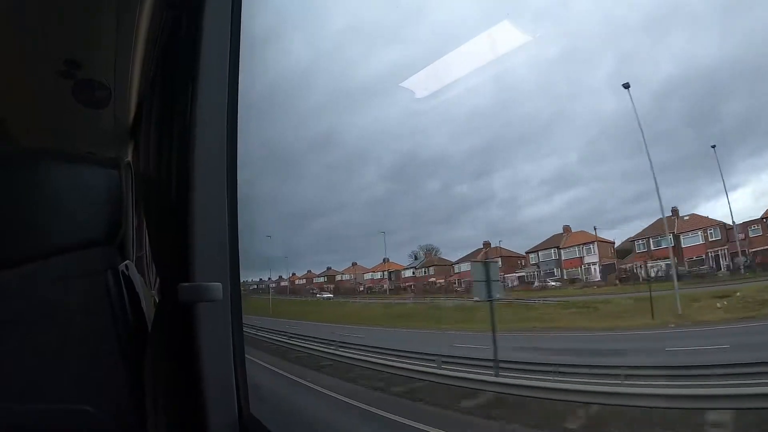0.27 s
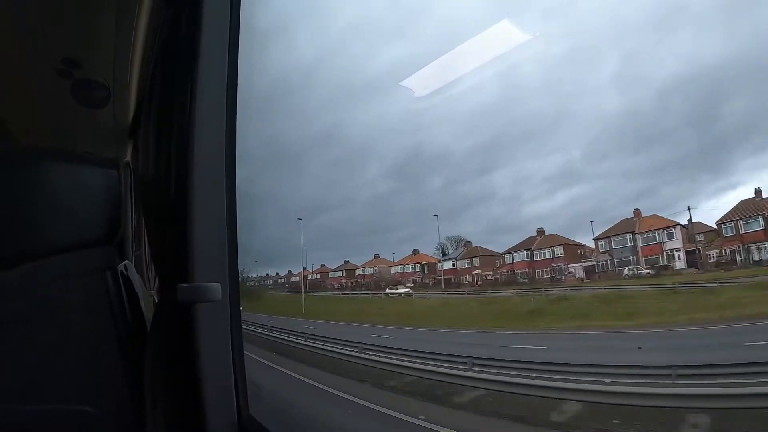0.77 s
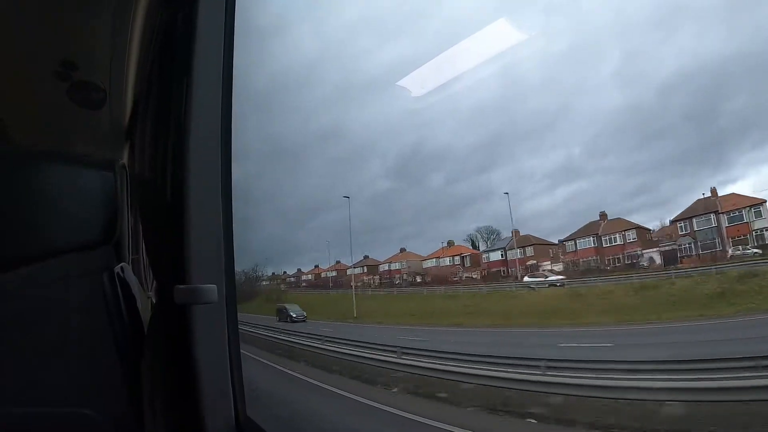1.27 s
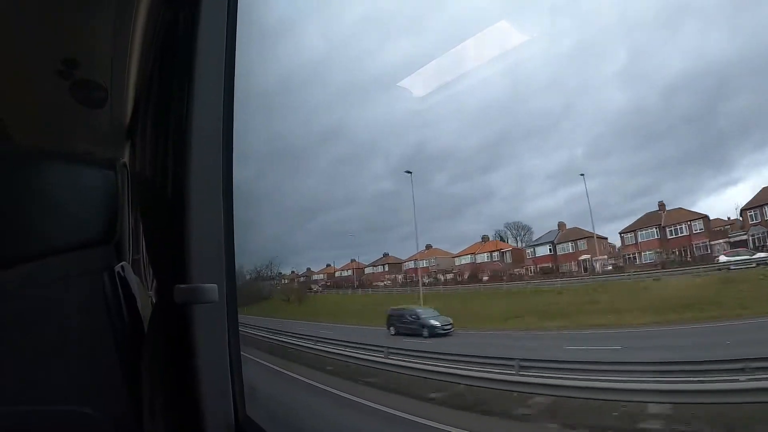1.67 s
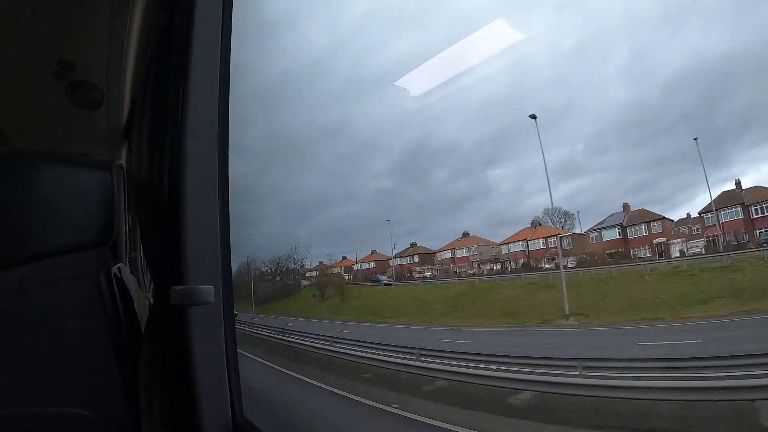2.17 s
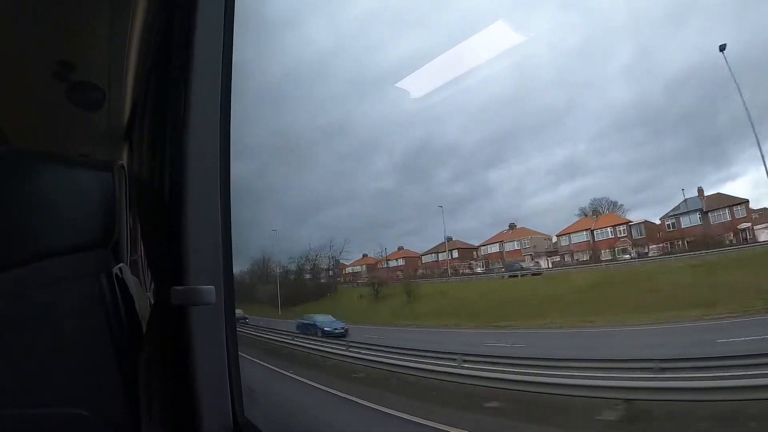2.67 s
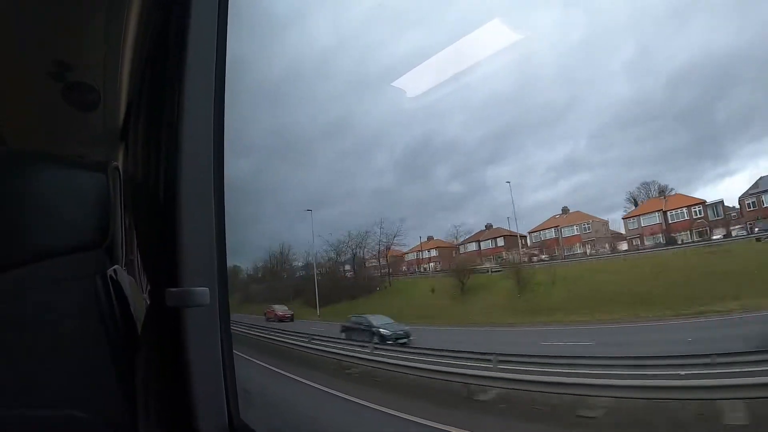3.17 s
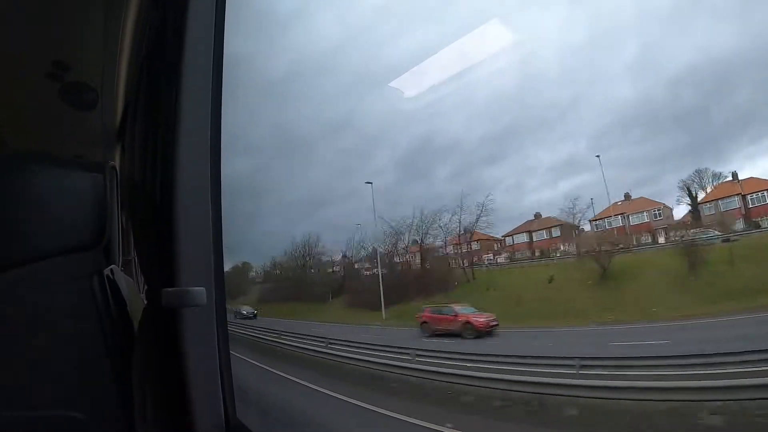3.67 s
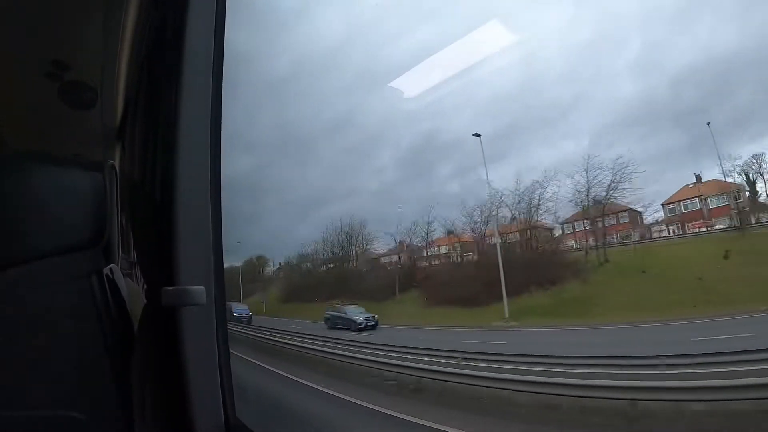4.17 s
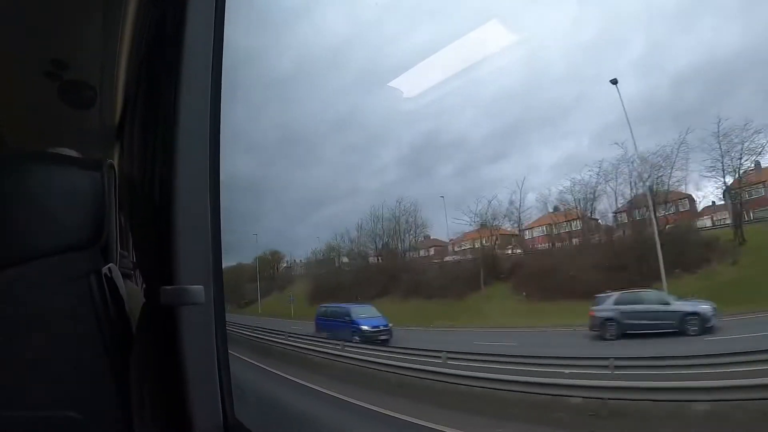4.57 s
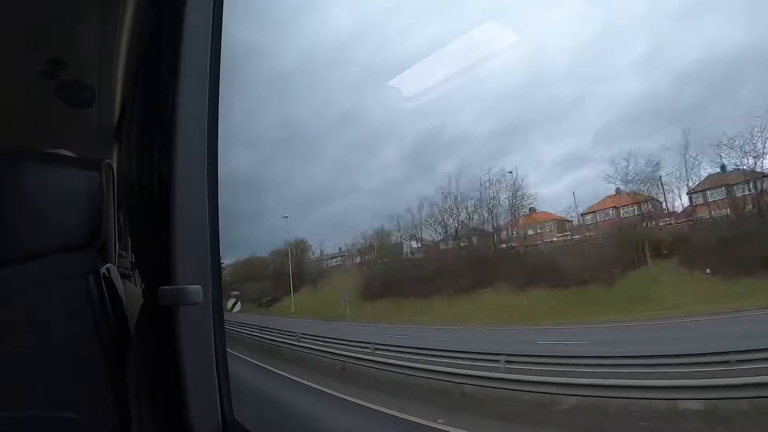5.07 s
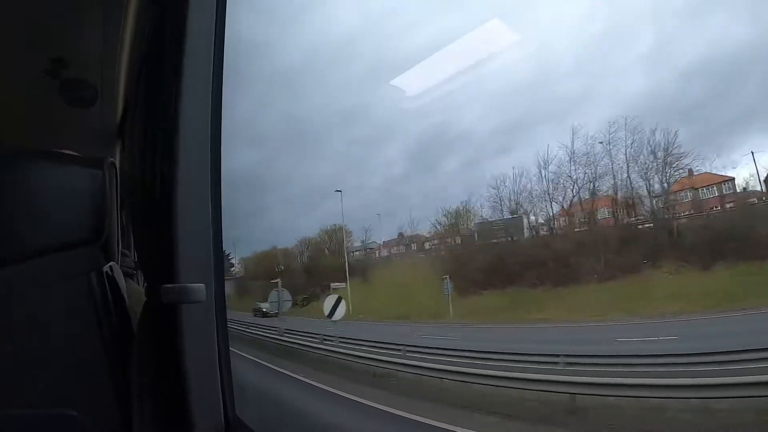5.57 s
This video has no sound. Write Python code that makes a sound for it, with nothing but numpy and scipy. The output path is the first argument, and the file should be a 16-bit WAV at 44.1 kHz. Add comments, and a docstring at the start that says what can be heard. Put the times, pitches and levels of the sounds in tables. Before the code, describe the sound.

A continuous coach interior of nearly six seconds, heard by a phone near the window. From the start a large diesel under load gives a deep, strong drone near 80 hertz with a fast throb and a grainy mid-range growl; its pitch climbs only a few percent until about 5.3 s. Around it lies bass-heavy road rumble, boomiest in the first second, and soft, dull tyre hiss, with steady low fan hums beneath. A tiny squeak leans left at about 0.8 s. From 1.1 s the engine's upper knock is a little clearer. A faint tick comes at 2.7 s, then small dry trim rattles from 3.6 s, clustering most audibly at 4.0 to 4.2 s, with weaker ones at 4.4, 4.5, 5.1 and after 5.6 s. Around 5.65 s the throttle lifts and the engine growl softens while road noise continues. The other vehicles outside make no distinct passing sounds.

```python
"""Coach interior, diesel pulling on a main road

Inside a coach, a phone by the window, its two microphone ports giving left and right. A six-cylinder diesel
gains speed slowly: sines at multiples of its cycle swell through floor and body until the throttle lifts.
Road and tyre roar is noise coloured by the cabin; trim rattles and a squeak are bursts of filtered ticks,
and two steady hums, likely electric fans, run beneath. Levels are before the gain in record()."""
import sys
import numpy as np
from scipy import signal
from scipy.fft import rfft, irfft
from scipy.io import wavfile
from scipy.ndimage import uniform_filter1d, minimum_filter1d

SR = 44100
rng = np.random.default_rng(int(sys.argv[2]) if len(sys.argv) > 2 else 0)


def log_audio(samples):
    """Write samples as a 16-bit WAV file to the path given in sys.argv[1]."""
    # one column per channel
    frames = np.atleast_2d(samples).T
    # limit to full scale, then quantise
    limited = np.clip(frames, -1, 1)
    pcm = np.round(limited * 32767).astype(np.int16)
    wavfile.write(sys.argv[1], SR, pcm)


N = 256662

# Road roar through the body, alike at both ports, before the cabin rings: f/Hz, density/dB per Hz
ROAD_ROAR = [(18, -47), (65, -42.5), (110, -44.5), (170, -50), (200, -54), (400, -60), (800, -66.5),
             (1500, -73), (2600, -77.5), (4500, -93.5), (7500, -100), (9500, -109), (13200, -120),
             (14500, -134)]
# Scattered cabin sound, opposite at the two ports, before the cabin rings: f/Hz, density/dB per Hz
SCATTERED_ROAR = [(18, -76.5), (70, -62), (150, -68), (300, -77), (700, -70), (1000, -77.5), (1900, -85.5),
                  (2400, -82.5), (3200, -91.5), (5000, -95.5), (7500, -99), (9500, -109), (12500, -118),
                  (14500, -135)]
# Cabin and panel resonances and notches: f/Hz, width/Hz, boost/dB
CABIN_RINGS = [(41, 5, 2.5), (141, 10, 11), (275, 30, 4), (432, 44, 7), (490, 30, -4), (529, 32, 5.5),
               (613, 13, -6), (640, 40, 3), (690, 20, -3.5), (880, 60, 2), (896, 27, -4), (1035, 100, 3.5),
               (1350, 36, 3.5), (1428, 36, 4), (1850, 50, 6), (1920, 63, -4), (2130, 90, 3),
               (2370, 28, 0.5), (2480, 55, 3.5), (2660, 35, 1.5), (2890, 23, 5), (3000, 34, 0.5),
               (3440, 50, 1.5), (3280, 80, -1.5), (3750, 73, 3.5), (4200, 230, 2.5)]
# Slow swell of the roar, bands centred up to 60 Hz: t/s, level/dB
DEEP_SWELL = [(0, 8.5), (1.2, 1), (2.3, 1), (3.4, 0), (4.2, 3.5), (4.8, 3), (5.82, 1.5)]
# Slow swell of the tyre hiss, bands centred above 900 Hz: t/s, level/dB
HISS_SWELL = [(0, 0), (1.5, 0), (2.5, .5), (3.9, .5), (4.5, -0.24), (5.82, -2)]
# Further swell of the hiss, bands centred above 5 kHz: t/s, level/dB
TREBLE_SWELL = [(0, -1.5), (2.1, -1.5), (2.4, 1), (3.2, -1.5), (4.2, 1), (5.3, 0), (5.82, -0.5)]
# Tones that keep their pitch, likely electric fans: f/Hz, level at start/dB, level at end/dB
FAN_HUMS = [(104, -22.5, -30), (73, -36, -33)]
# Trim rattles: t/s, level before decay/dB, centre f/Hz, length/s, left minus right/dB
TRIM_RATTLES = [(2.734, -57, 6000, .015, -1), (3.624, -55, 6500, .03, 8), (3.844, -47.5, 6000, .02, 6),
                (4.03, -52, 3800, .025, 3), (4.127, -52, 7500, .008, -11), (4.16, -43, 5000, .02, -4),
                (4.178, -45, 4600, .024, -.5), (4.375, -59, 7500, .012, 1), (4.508, -54, 7800, .024, -7),
                (5.09, -59, 6500, .03, 6), (5.15, -53.5, 5800, .065, -1), (5.63, -56, 8500, .015, 3),
                (5.72, -57, 6500, .02, 1)]
# Trim squeaks: t/s, level before decay/dB, centre f/Hz, length/s, left minus right/dB
TRIM_SQUEAKS = [(.762, -55, 4150, .038, 8)]
# What the trim rings with: f/Hz, width/Hz, boost/dB
TRIM_RINGS = [(2650, 250, 6), (3450, 300, 7), (4150, 350, 4), (5400, 500, 6), (7200, 500, 6)]
# Four-stroke cycle rate of the engine, six firings a cycle: t/s, f/Hz
CYCLE_RATE = [(0.0, 13.112), (0.5, 13.119), (1.0, 13.181), (1.5, 13.206), (2.0, 13.196), (2.5, 13.255),
              (3.0, 13.251), (3.5, 13.348), (4.0, 13.414), (4.5, 13.487), (5.0, 13.57), (5.3, 13.605),
              (5.55, 13.59), (5.82, 13.55)]
# Engine tones before load and body resonance: multiple of the cycle, level/dB
ENGINE_TONES = [(3, -34), (6, -12.8), (7, -36.9), (9, -59.4), (10, -28.2), (11, -51.5), (12, -24.3),
                (13, -52.4), (14, -55.3), (15, -52.5), (16, -41.6), (18, -51.6), (19, -44.7), (20, -48.8),
                (21, -45.9), (22, -40.6), (23, -44.7), (24, -46.5), (25, -60.0), (26, -56.8), (27, -46.9),
                (28, -48.2), (30, -56.7), (31, -61.1), (32, -60.5), (33, -62.6), (34, -66.5), (35, -56.5),
                (36, -55.3), (38, -59.1), (39, -48.8), (42, -46.8), (43, -60.4), (44, -62.0), (45, -55.3),
                (46, -60.5), (48, -57.1), (50, -62.3), (51, -59.7), (53, -65.5), (54, -56.5), (55, -58.5),
                (56, -58.0), (57, -66.5), (59, -64.7), (60, -67.5), (62, -64.5), (63, -65.5), (66, -67.0),
                (80, -66.5)]
# Shafts, pumps and a gear mesh geared to the engine, likewise: multiple of the cycle, level/dB
GEARED_TONES = [(1.6, -28.5), (20.45, -35.5), (40.9, -47.5), (108, -69.5)]
# Floor and body resonances that engine tones cross as the speed rises: f/Hz, width/Hz, boost/dB
BODY_RINGS = [(40.55, .9, 14), (94.7, 1.4, 7.6), (120.7, 5.4, 21.0), (122.8, 8.1, 21.0), (148, 9, 20.1),
              (170.8, 1.6, 15.8), (184.2, 9.4, 21.0), (199.6, 11.7, 20.9), (242.1, 10.9, 21.0),
              (264.6, 3.5, 11.5), (326.1, 10.3, 12.5), (343.4, 9.3, 21.0), (375.9, 4.9, 5.1),
              (414.7, 26.7, 20.2), (437.3, 6.5, 15.1), (454.2, 23.2, 19.6), (502.7, 4.8, 10.4),
              (538.0, 13.0, 8.5), (561.9, 5.1, 6.9), (585.6, 20.3, 13.4), (642.0, 24.7, 10.5),
              (672.2, 9.0, 6.9), (729.0, 42.0, 15.5), (812, 20, 11), (845.0, 24, 21.0),
              (1079.4, 21.6, 14.4), (1422, 44, 20)]
# Multiples that crest together and give each firing its sharp top
CRESTING_TONES = (3, 6, 12)
# Multiples that dip while those crest, which evens out the firings
DIPPING_TONES = (7, 9, 10, 15)
# Level tilt of body-borne sound between the ports: f/Hz, left minus right/dB
PORT_TILT = [(60, -0.5), (94, -0.5), (150, -0.5), (230, -0.5), (350, -1.5), (550, -1.5), (860, -1.5),
             (1340, 1.0), (2090, 2.5), (3260, 1.5)]
# Phase lead of body-borne sound at the left port: f/Hz, lead/rad
PORT_PHASE = [(0, -.03), (430, .3), (750, .4), (1100, 0), (2000, -.45), (2700, -.95), (3450, -.7)]

RATTLE_WIDTH, SQUEAK_WIDTH = 1.1, .05  # bandwidth, as a share of the centre
# Load on the engine: harder pull while gaining speed, then the throttle lifts
PULL_DB_PER_HZ_S, USUAL_GAIN_HZ_S = 10, .1
LIFT_S, LIFT_LENGTH_S, LIFT_DB = 5.66, .05, -12
KNOCK_LEADS_S = .36  # the sharpest knock dies away first as the fuel is cut
KNOCK_FROM_S, KNOCK_RISE_S, KNOCK_RISE_DB = 1.12, .06, 6  # the upper knock swells in here
GRAIN_DB, GRAIN_RAD = 2.1, .2  # random wander of each tone's level and phase, full on the middle tones
CREST_LEAN_RAD = .008  # per multiple squared: each firing falls faster than it rises
TOP_HZ = 15600  # where the top is cut


def undb(db):
    """Decibels to gain."""
    return 10 ** (np.asarray(db) / 20)


def curves(table):
    """Columns of a time table, one value a sample."""
    t, *columns = np.transpose(table)
    return [np.interp(np.arange(N) / SR, t, column) for column in columns]


def walk(rate):
    """Random values held for 1 / rate s and slewed twice; spread near 1."""
    hold = int(SR / rate)
    steps = np.repeat(rng.standard_normal(N // hold + 1), hold)
    return 1.71 * uniform_filter1d(uniform_filter1d(steps, hold), hold)[:N]


def boost(table, hz):
    """Summed dB of resonances at the given frequencies, each a bell around its centre."""
    return sum(boost_db / (1 + (2 * (hz - f) / width) ** 2) for f, width, boost_db in table)


def noise(hz, points):
    """Spectrum of a noise with the given density over log frequency, coloured by the cabin."""
    f, density_db = np.transpose(points)
    db = np.interp(np.log(hz), np.log(f), density_db) + boost(CABIN_RINGS, hz)
    return rfft(rng.standard_normal(N)) * undb(db) * np.sqrt(SR / 2)


def surface(spectrum, hz):
    """Octave bands of the roar flicker on their own; the deepest and the hiss also swell slowly."""
    deep_db, = curves(DEEP_SWELL)
    hiss_db, = curves(HISS_SWELL)
    treble_db, = curves(TREBLE_SWELL)
    roar = np.zeros(N)
    for centre in 30 * 2. ** np.arange(10):
        octaves_away = np.log2(np.clip(hz, 30, 15360) / centre)
        band = irfft(spectrum * np.clip(1 - abs(octaves_away), 0, 1), N)
        flicker_db = .5 + .22 * np.clip(np.log2(centre / 900), 0, 1)
        level_db = deep_db * (centre <= 60) + hiss_db * (centre > 900) + treble_db * (centre > 5000)
        roar += band * undb(level_db + flicker_db * walk(9))
    return roar


def fans():
    """Steady sine hums that waver a little in pitch and level."""
    hum = np.zeros(N)
    for hz, start_db, end_db in FAN_HUMS:
        wavering_hz = hz * (1 + .004 * walk(2))
        phase = 2 * np.pi * (np.cumsum(wavering_hz) / SR + rng.random())
        level_db = np.linspace(start_db, end_db, N) + 1.5 * walk(3.8)
        hum += np.sqrt(2) * undb(level_db) * np.sin(phase)
    return hum


def shake(table, width):
    """Each bump shakes a panel: dense uneven ticks through its resonance, partly unlike left and right."""
    out = np.zeros((2, N))
    t = np.arange(4096) / SR
    for start_s, db, hz, length, pan_db in table:
        shape = np.clip(t / .001, 0, 1) * np.exp(-(t / length) ** 3)
        uneven_db = 3.5 * np.repeat(rng.standard_normal(128), 32)
        ticks = rng.standard_normal((3, 4096)) * undb(uneven_db)
        both_sides = ticks[:1] + .6 * ticks[1:]  # shared ticks plus each side's own
        edges = [hz * (1 - width / 2), hz * (1 + width / 2)]
        ring = signal.sosfilt(signal.butter(3, edges, "band", fs=SR, output="sos"), both_sides)
        ring = signal.lfilter(*signal.butter(2, 4500, fs=SR), ring)  # upholstery dulls the top
        ring = irfft(rfft(ring) * undb(boost(TRIM_RINGS, np.linspace(0, SR / 2, 2049))))
        side_db = db + np.array([[pan_db], [-pan_db]]) / 2
        ring = ring / ring.std() * shape * undb(side_db)
        i = int(start_s * SR)
        out[:, i:i + 4096] += ring[:, :N - i]
    return out


def rattles():
    """Trim shaken into broad-band rattles and narrow-band squeaks."""
    return shake(TRIM_RATTLES, RATTLE_WIDTH) + shake(TRIM_SQUEAKS, SQUEAK_WIDTH)


def load(early=0):
    """Load in dB: follows the gain in speed, falls in a smooth step at the lift (early in s)."""
    hz, = curves(CYCLE_RATE)
    gain_hz_s = uniform_filter1d(np.gradient(hz) * SR, size=SR, mode="nearest")
    pull_db = PULL_DB_PER_HZ_S * (gain_hz_s - USUAL_GAIN_HZ_S)
    lift = (1 + np.tanh((np.arange(N) / SR + early - LIFT_S) / LIFT_LENGTH_S / 2)) / 2
    return (1 - lift) * pull_db + lift * LIFT_DB


def tones(table, crank, waver_db):
    """Sines locked to the crankshaft swell and fade as the speed carries them across resonances."""
    hz, = curves(CYCLE_RATE)
    turn = crank + 2 * np.pi * np.cumsum(hz) / SR
    load_db, knock_load_db = load(), load(KNOCK_LEADS_S)
    knock_held_back = 1 / (1 + np.exp((np.arange(N) / SR - KNOCK_FROM_S) / KNOCK_RISE_S))
    steps = np.arange(0, N, 256)
    out = np.zeros(N)
    for multiple, db in table:
        body_db = np.interp(np.arange(N), steps, boost(BODY_RINGS, multiple * hz[steps]))
        # firing tone and sharp upper knock follow gas pressure most
        share = 1 if multiple in (3, 6) else .15 if multiple < 14 else .7
        level_db = db + body_db + share * (knock_load_db if 50 < multiple < 64 else load_db)
        # low tones hold steady, high ones throb
        level_db += waver_db * np.clip(np.log2(multiple / 8), .2, 1.) * walk(4.015)
        if 50 < multiple < 60:
            level_db -= KNOCK_RISE_DB * knock_held_back
        grain = 1 if 13 < multiple < 50 else .4 if multiple > 50 else .1
        level_db += grain * GRAIN_DB * walk(hz[0])
        start = 2 * np.pi * rng.random()
        if multiple in CRESTING_TONES + DIPPING_TONES:
            start = CREST_LEAN_RAD * multiple ** 2 + np.pi * (multiple in DIPPING_TONES)
        phase = multiple * turn + start + grain * GRAIN_RAD * walk(hz[0])
        out += np.sqrt(2) * undb(level_db) * np.cos(phase)
    return out


def engine():
    """Whole multiples of the four-stroke cycle, and the parts geared to it."""
    crank = 2 * np.pi * rng.random()
    return tones(ENGINE_TONES, crank, waver_db=.7) + tones(GEARED_TONES, crank, waver_db=.8)


def scene():
    """Body-borne sound meets the two ports with a small lead and tilt; scattered sound is opposite in them."""
    hz = np.maximum(np.arange(N // 2 + 1) * SR / N, 1)
    scatter = surface(noise(hz, SCATTERED_ROAR), hz)
    body = surface(noise(hz, ROAD_ROAR), hz) + fans() + engine()
    # mirrored ends: the sound runs on, no step
    body = rfft(np.r_[body, body[:-4097:-1], body[4096:0:-1]])
    port_hz = np.linspace(0, SR / 2, len(body))
    tilt_db = np.interp(port_hz, *np.transpose(PORT_TILT))
    lead = np.interp(port_hz, *np.transpose(PORT_PHASE))
    port = undb(tilt_db / 2) * np.exp(.5j * lead)  # half to each side
    left = irfft(body * port)[:N] + scatter
    right = irfft(body / port)[:N] - scatter
    return np.array([left, right]) + rattles()


def record(dry):
    """The phone cuts the deepest bass, its limiter turns the loudest swings down, and the top is cut."""
    clear = undb(1.65) * signal.sosfilt(signal.butter(2, 14, "high", fs=SR, output="sos"), dry)
    peak = -minimum_filter1d(-np.abs(clear).max(axis=0), size=900)  # running maximum
    knee, strength = .8, .6
    gain = uniform_filter1d(np.minimum(1, (knee / peak) ** strength), size=600)
    return signal.sosfilt(signal.ellip(8, .2, 70, TOP_HZ, fs=SR, output="sos"), clear * gain)


dry = scene()
out = record(dry)
log_audio(out)
```